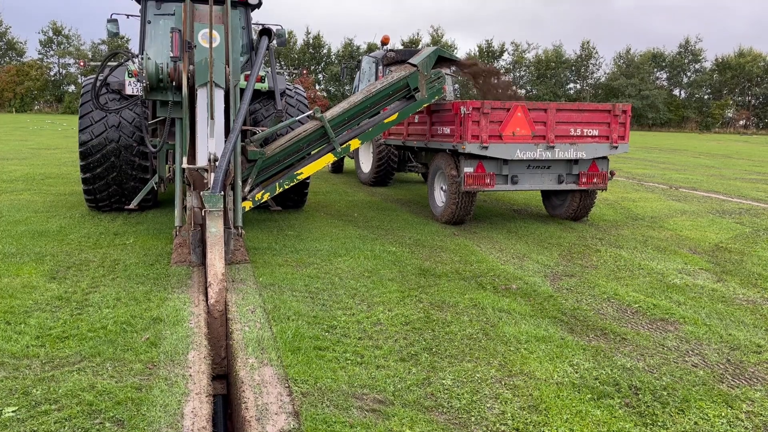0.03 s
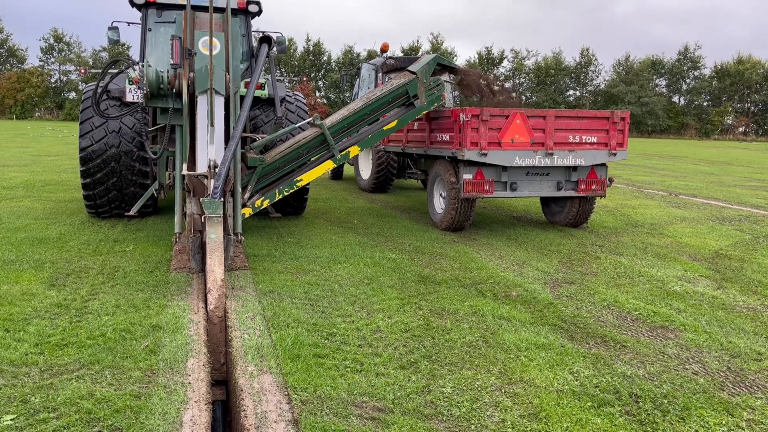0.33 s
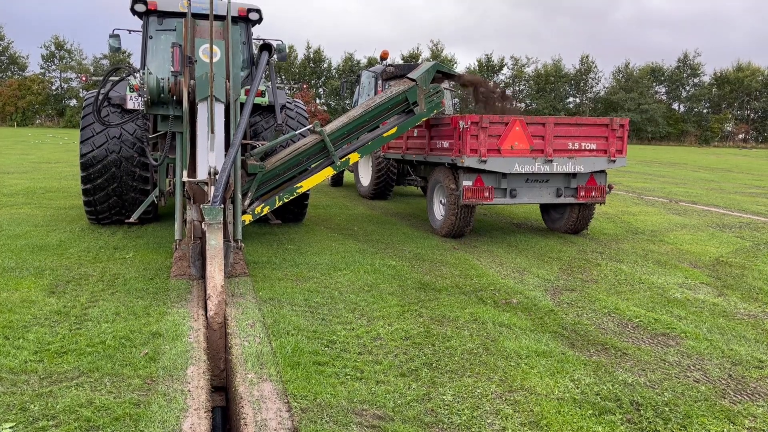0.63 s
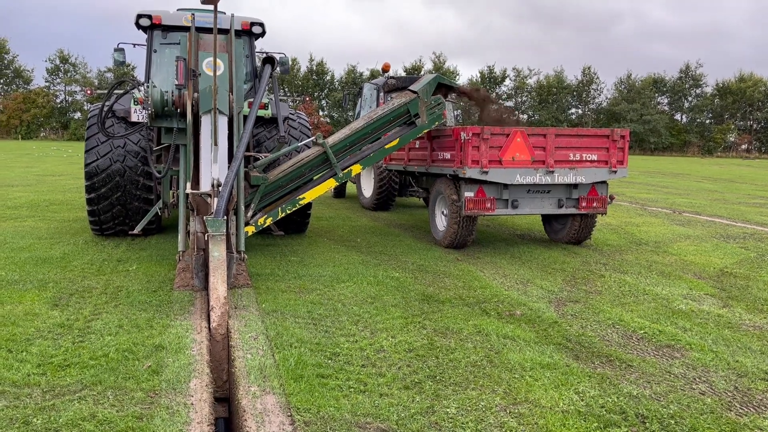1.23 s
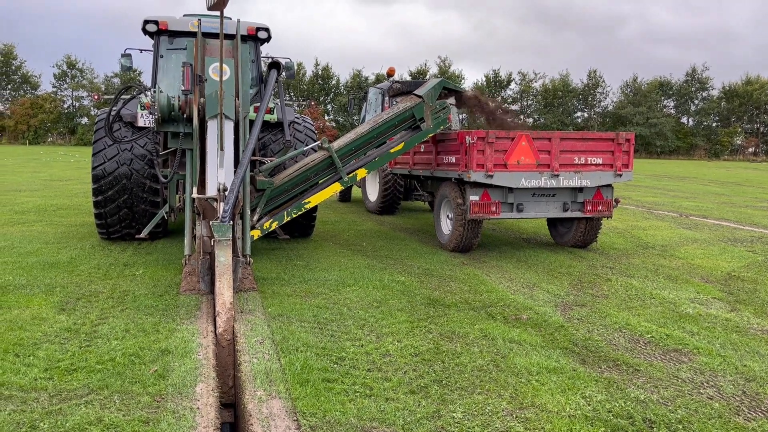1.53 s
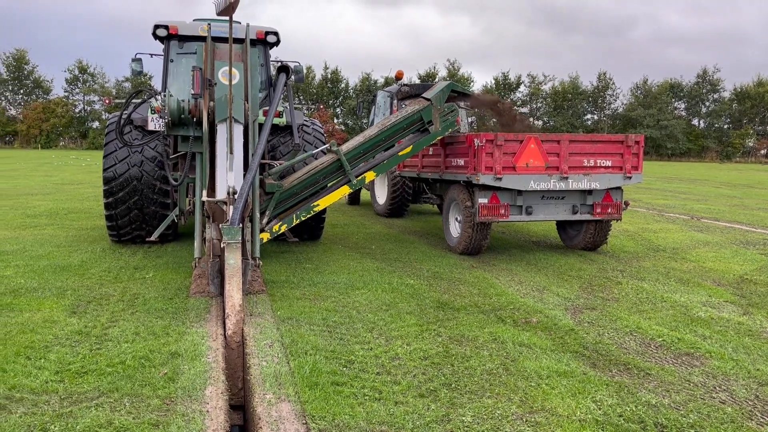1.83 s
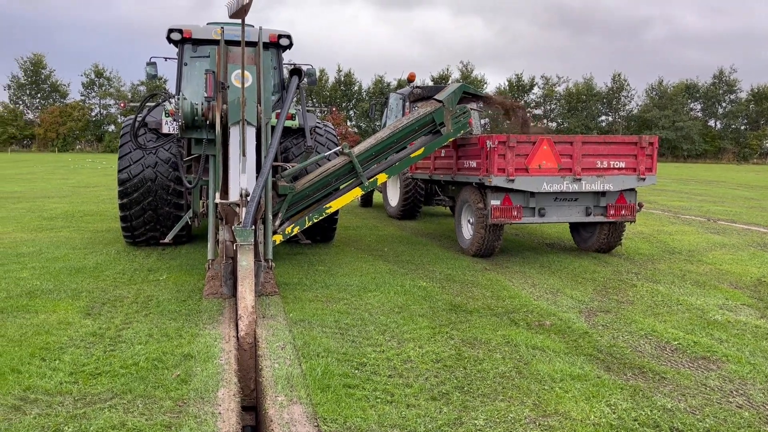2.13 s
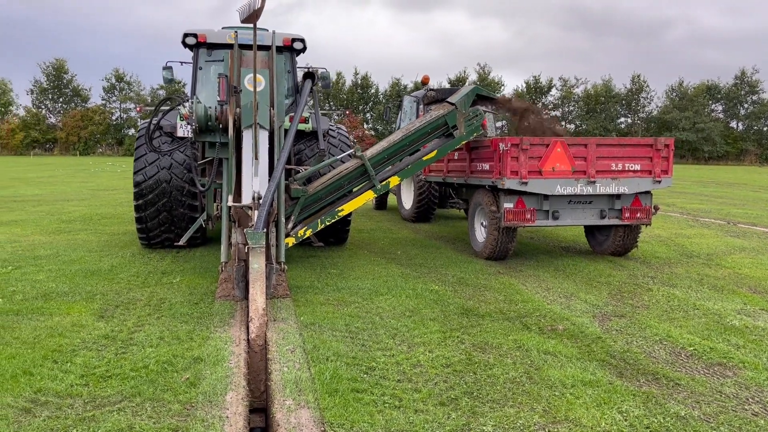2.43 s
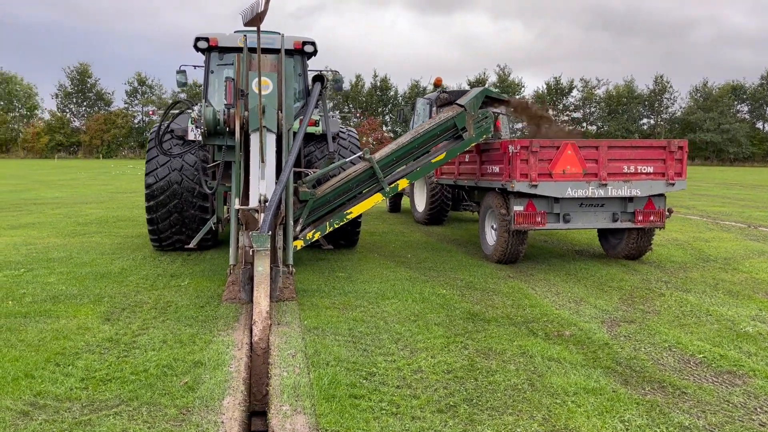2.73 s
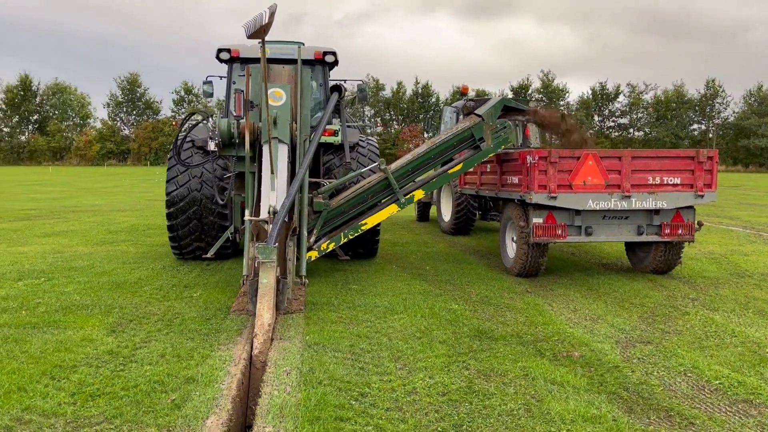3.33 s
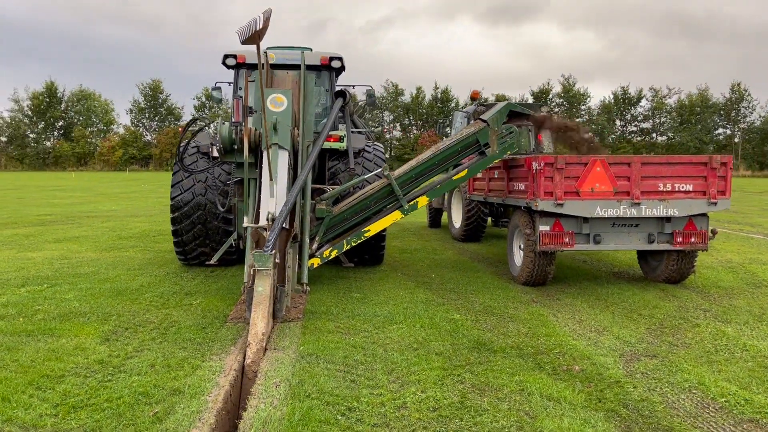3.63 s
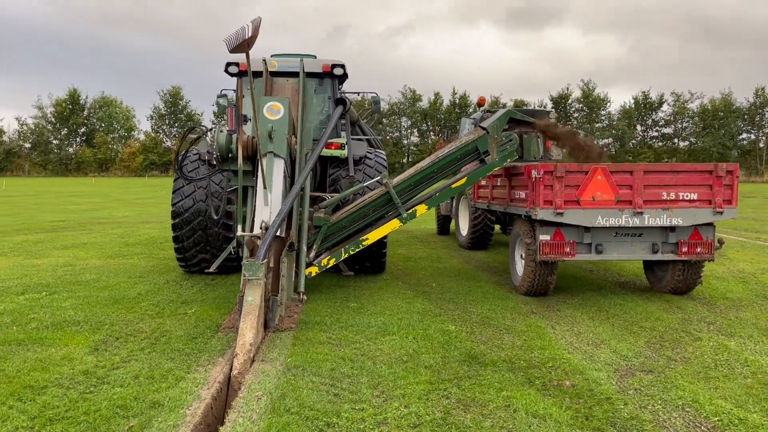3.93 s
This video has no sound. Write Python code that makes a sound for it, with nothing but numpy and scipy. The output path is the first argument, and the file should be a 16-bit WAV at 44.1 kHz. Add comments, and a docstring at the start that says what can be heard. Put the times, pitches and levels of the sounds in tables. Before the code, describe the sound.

A tractor-driven chain trencher digs a few metres away for the whole four seconds, a low, gritty roar pulsing with rapid tooth bites. Stones crunch and clank on steel and clods thud softly throughout, with tiny chain squeaks from about 1.3 seconds. A working tractor, an idling one and a faint gear whine drone underneath. Between about 2.5 and 3 seconds the sound shifts from left to centre.

```python
"""On open turf, a tractor-driven chain trencher cuts a few metres ahead; a second tractor idles beside it.
Teeth bite in a quick rhythm, driving soil and grit through ringing steel guards. Stones crunch, the chain
knocks on the guards, clods thud, the chain squeaks on stone. Exhaust tones and gear whines drone underneath.
Past halfway the listener shifts, and the machine moves from the left towards the centre."""
import sys
import numpy as np
from scipy import signal
from scipy.fft import rfft, irfft
from scipy.io import wavfile
from scipy.ndimage import uniform_filter1d

SR = 44100
rng = np.random.default_rng(int(sys.argv[2]) if len(sys.argv) > 2 else 0)


def persist_wave(psi):
    """Save psi, clipped to +-1, as 16-bit WAV."""
    counts = np.round(np.clip(psi, -1, 1) * 32767).astype(np.int16)
    wavfile.write(sys.argv[1], SR, np.atleast_2d(counts).T)


N = 176400

# chain speed: time_s, teeth_per_s
CHAIN_SPEED = [(0, 12.6), (0.5, 13.5), (0.9, 13.7), (1.3, 12.5), (2, 12.3), (2.35, 13.6), (2.8, 12.85),
               (3.6, 12.7), (4, 12.3)]
# digging load: time_s, gain_db
DIG_LOAD = [(0, 2), (.1, 1.3), (.2, -1.4), (.34, 0.25), (.87, 1.2), (.94, -2), (1.09, 2.8), (1.15, 4),
            (1.22, -0.5), (1.47, 1.3), (1.73, -1), (1.9, 1.9), (2.1, -1.1), (2.5, -.3), (2.63, -2.4),
            (2.69, 0), (2.9, 0), (2.98, -2.5), (3.19, 1.4), (3.31, -3.5), (3.42, -0.8), (3.68, -1.5),
            (3.75, 1.5), (3.81, -0.5), (3.88, 0.7), (4, 0.5)]
# stones crunching in the chain: centre_s, half_width_s, swell_db
STONE_CRUNCHES = [(.09, .005, 2.5), (0.257, 0.008, 4), (0.342, 0.012, 5), (.479, .005, 4),
                  (.813, 0.0046, 3), (1.076, 0.0064, 3.5), (1.163, 0.012, 3.5), (1.253, 0.0034, 7),
                  (1.398, 0.0051, 5), (1.493, 0.0046, 5.5), (1.561, 0.0054, 5), (1.856, 0.0073, 2.5),
                  (1.886, 0.014, 3.5), (2.051, 0.0089, 3.5), (2.204, .007, 5), (2.416, 0.0094, 7.5),
                  (2.492, .003, 5), (2.683, 0.011, 6), (2.725, .016, 3.5), (2.895, .008, 3),
                  (3.047, 0.0065, 8.5), (3.127, .005, 4), (3.18, .011, 5), (3.208, .008, 4.5),
                  (3.357, .004, 4.5), (3.44, .006, 5), (3.598, 0.011, 6)]
# roar of chain and soil, with microphone colour above 8 kHz: freq_hz, gain_db
ROAR_COLOUR = [(30, -28.5), (45, -18), (65, -9.5), (90, -2), (130, 0), (220, 1), (290, -4), (400, -6),
               (620, -7.8), (800, -9.2), (1150, -12.5), (1420, -26), (1570, -28.5), (1700, -21.5),
               (2200, -24), (2900, -26), (3600, -30), (5600, -30), (6200, -29.5), (7600, -31.5),
               (9200, -47), (10900, -33), (12100, -39), (12900, -57), (14000, -38.5), (15000, -34.5),
               (15500, -48)]
# steel guard resonances up to 5 kHz, plus a thin microphone ring at 11.6 kHz: freq_hz, width_hz, boost_db
RESONANCES = [(955, 100, 8), (1294, 123, 8.5), (1770, 350, 5.3), (3270, 280, 8), (3790, 200, 8),
              (4347, 280, 9.5), (4887, 400, 8.5), (11630, 590, 12)]
# low rumble of digging: time_s, gain_db
RUMBLE_GAIN = [(0, 0), (.93, 0), (1.15, 1), (1.22, -1), (1.7, -1), (2.05, .5), (2.12, -1), (2.19, 2.5),
               (2.35, -1), (2.47, 1.5), (2.8, -1.5), (2.88, -0.5), (2.97, -1.5), (3.2, -0.5), (3.3, -2),
               (3.6, -.5), (4, -1.5)]
# sizzle of fine soil: time_s, gain_db
SIZZLE_GAIN = [(0, -1.5), (.35, 0), (.7, 0.5), (.95, -0.5), (1.1, 4), (1.32, 2), (1.55, -1.5), (1.9, 2),
               (2.3, 3.5), (2.55, 1.5), (2.9, 0.5), (3.3, 0.5), (3.6, -1.5), (3.85, 1), (4, 4.5)]
# chain knocking on the guards: start_s, pitch_hz, relative_db
GUARD_KNOCKS = [(.086, 4350, -24), (.091, 960, -12), (.252, 925, -11.5), (.335, 893, -14),
                (.476, 4330, -24), (.572, 1711, -22.5), (.810, 3240, -23.5), (.850, 947, -14.5),
                (1.073, 11700, -25), (1.108, 1830, -24), (1.186, 1885, -24), (1.249, 1740, -22),
                (1.309, 11644, -23), (1.429, 1722, -23.5), (1.475, 972, -16), (1.485, 1754, -23),
                (1.568, 1710, -23), (1.649, 1733, -25), (1.848, 1819, -22), (1.877, 951, -18),
                (1.926, 954, -18), (1.969, 1701, -22.5), (2.201, 4320, -24), (2.413, 4374, -21.5),
                (2.680, 4340, -24), (3.042, 1765, -23), (3.120, 904, -19), (3.270, 990, -14.5),
                (3.353, 920, -15.5), (3.408, 1846, -23.5), (3.418, 952, -17), (3.589, 963, -18),
                (3.762, 889, -15), (3.828, 940, -12)]
# clods landing in the trench: start_s, pitch_hz, level_db
CLOD_THUDS = [(.068, 186, -17), (.151, 230, -16.5), (.345, 125, -13), (.62, 216, -12.5), (1.01, 216, -15),
              (1.14, 118, -18), (2.42, 160, -15), (2.512, 204, -13), (2.635, 231, -16), (2.73, 140, -17),
              (2.868, 200, -12.5), (3.043, 203.9, -17), (3.172, 200, -15), (3.196, 123, -10.5),
              (3.593, 167, -15.5)]
# chain slipping on stone, plus one stone clinking on steel at 1.312 s: start_s, final_pitch_hz, relative_db,
# decay_s, fall_hz
CHAIN_SQUEAKS = [(1.312, 4340, -26, 0.0064, 0), (1.555, 3420, -18, 0.0075, 0), (1.6, 3245, -24, 0.0065, 0),
                 (2.48, 5550, -21, 0.009, 1400), (2.91, 5820, -32, 0.011, 0),
                 (3.467, 5800, -28, 0.0051, 150), (3.621, 5794, -32, 0.01, 0), (3.901, 2834, -26, .011, 0)]
# working tractor's exhaust: cycle_harmonic, first_place_db, second_place_db
WORK_EXHAUST = [(2, -26, -26), (3, -2, -2), (6, -5, -7), (12, -12, -11.5), (13, -17, -17.5)]
# idling tractor's exhaust: firing_harmonic, first_place_db, second_place_db
IDLE_EXHAUST = [(1, -22, -22), (2, -1, -.5), (3, 3.5, 1), (5, -3, -3.5)]
# gears and conveyor: pitch_hz, level_db
DRIVE_WHINES = [(315, -35.5), (444, -43)]
# likeness of the roar at the two ears: freq_hz, coherence
EAR_COHERENCE = [(120, 1), (300, 0.99), (600, 0.92), (1400, 0.88), (3500, 0.7), (6000, 0.34), (8000, 1),
                 (12000, 1)]
# path to the first listening place: freq_hz, right_db, right_lag_rad
FIRST_PATH = [(128, -1, 0.5), (476, -4.5, 0.5), (675, -9.5, 0.74), (960, -14.5, 0.23), (1262, -10.5, -2.5),
              (1366, -7, 7.5), (1732, 0.5, 0.33), (2330, -4, 0.8), (2780, -4, 0.97), (3330, -13.5, 1),
              (3960, -6.5, 0), (5000, -10.5, 0.7), (5400, -5, 0.3), (8180, -0.5, -3), (10200, 4, -4.5),
              (11900, -1.5, -6.5), (13200, 0, -6.4), (15100, 0, -9.5)]
# path to the second listening place: freq_hz, left_db, right_db, right_lag_rad
SECOND_PATH = [(132, .5, 0, 0), (220, -.5, -1, .1), (300, 1.5, 1, .1), (440, -3, -3.3, 0.3),
               (620, .5, -1, -0.27), (970, -2.3, -4.6, 0.47), (1180, -0.5, -9, 1), (1380, 3.3, 6.7, 0.47),
               (1576, 7.5, 8, .6), (1735, -3, -4, 2), (1911.5, 1, 1, -0.5), (2300, 0, 0, -0.1),
               (2740, 1, 1, 1.3), (2870, 0, 7, 1.5), (3000, 0.5, 1, 2.2), (3400, -1, -7, 2),
               (4000, -2, -11, .5), (5000, -2.5, -11, .4), (5750, 1, -4, -0.1), (8400, -4.5, -3.5, -3.5),
               (9430, 4, 8.5, -3), (11040, -2.5, -3.5, -6), (13100, 2, 3, -7.5), (15000, -1, -1, -9)]

TIME_S = np.arange(N) / SR
FREQ_HZ = np.maximum(np.arange(N // 2 + 1) * SR / N, 1)
RING_AGE_S = np.arange(SR // 8) / SR


def trencher(roar_db=-18):
    """Soil rings the guards; the microphone colours the top. Returns partly alike left, right spectra."""
    force_db, pebbles = chain_force_db(), pebble_clinks()
    peaks_db = sum(db / (1 + (2 * (FREQ_HZ - hz) / width_hz) ** 2) for hz, width_hz, db in RESONANCES)
    response = minimum_phase(by_freq(ROAR_COLOUR) + peaks_db)
    roars = [irfft(soil(force_db, pebbles) * response, N) for _ in range(2)]
    near, other = (rfft(undb(roar_db) * unit(roar)) for roar in roars)
    coherence = by_freq(EAR_COHERENCE)
    impacts = rfft(chain_squeaks() + guard_knocks() + clod_thuds())
    return near + impacts, coherence * near + np.sqrt(1 - coherence ** 2) * other + impacts


def chain_force_db(bite_db=2.7, bite_width_teeth=.16, links_per_tooth=4, link_db=1.0, flutter_db=.55):
    """Soil load, links on the sprocket, and a tooth bite or a stone, whichever is harder."""
    teeth = cycles(curve(CHAIN_SPEED)) - .21
    from_bite = (teeth + .5) % 1 - .5
    bite = np.exp(-(from_bite / bite_width_teeth) ** 2) * (1 + .38 * wander(11))
    cut_db = np.maximum(bite_db * bite, crunch_db())
    links = np.cos(2 * np.pi * links_per_tooth * teeth)
    return curve(DIG_LOAD) + cut_db + link_db * links + flutter_db * wander(45)


def crunch_db():
    """Each stone in the chain adds a brief bell-shaped swell."""
    return sum(db * np.exp(-((TIME_S - centre_s) / half_width_s) ** 2)
               for centre_s, half_width_s, db in STONE_CRUNCHES)


def soil(force_db, pebbles, rumble_below_hz=573, sizzle_above_hz=8300, grit_db=-5.5, pebble_db=-19):
    """Digging spectrum: low rumble, scraping with grit and pebbles, fine sizzle on top."""
    grains = undb(grit_db) * grit()
    rush = unit((rng.standard_normal(N) + grains) * undb(force_db))
    scrape = unit(flicker_bands(rush)) + undb(pebble_db) * pebbles
    sizzle = unit(rush * undb(curve(SIZZLE_GAIN) + 2.5 * wander(18)))
    rumble_db = .18 * force_db + curve(RUMBLE_GAIN) + .35 * crunch_db()  # follows the chain only in part
    rumble = unit(rng.standard_normal(N) * undb(rumble_db + wander(21)))
    low = 1 / (1 + (FREQ_HZ / rumble_below_hz) ** 4)
    high = 1 / (1 + (sizzle_above_hz / FREQ_HZ) ** 8)
    return rfft(rumble) * np.sqrt(low) + rfft(scrape) * np.sqrt(1 - low) * (1 - high) + rfft(sizzle) * high


def grit(grains_per_s=1500, spread_db=2.5, decay_s=.0011):
    """Random grain impacts, each smeared into a tiny burst with a flat spectrum."""
    hits = (rng.random(N) < grains_per_s / SR) * rng.standard_normal(N)
    hits *= undb(spread_db * np.minimum(rng.exponential(size=N), 5))
    smear = rfft(rng.standard_normal(512) * np.exp(-TIME_S[:512] / decay_s), N)
    return unit(irfft(rfft(hits) * smear / np.abs(smear), N))


def flicker_bands(rush, depth_db=1.2, rate_hz=44.2):
    """Overlapping half-octave bands of the scraping flicker separately."""
    spectrum = rfft(rush)
    half_octaves = np.clip(2 * np.log2(FREQ_HZ / 500), 0, 9)
    bands = (irfft(spectrum * np.maximum(1 - np.abs(half_octaves - k), 0), N) for k in range(10))
    return sum(band * undb(depth_db * wander(rate_hz)) for band in bands)


def pebble_clinks(clinks_per_s=70, low_hz=2900, high_hz=7080, spread_db=2.6, decay_s=.0051):
    """Pebbles tick against steel, each with its own pitch and size."""
    age_s = TIME_S[:2048]
    out = np.zeros(N + len(age_s))
    for when, pitch, size in rng.random((int(clinks_per_s * N / SR), 3)):
        start = int(when * N)
        hz = low_hz * (high_hz / low_hz) ** pitch
        db = spread_db * min(-np.log(1 - size), 3)
        out[start:start + len(age_s)] += undb(db) * np.exp(-age_s / decay_s) * np.sin(2 * np.pi * hz * age_s)
    return unit(out[:N])


def guard_knocks(gain_db=-1.5, decay_at_1khz_s=.012):
    """Each knock of the chain on the guards excites one resonance; higher ones die sooner."""
    return sum(undb(db + gain_db) * ring(start_s, hz, decay_s=decay_at_1khz_s * (hz / 1000) ** -.4,
                                         rise_s=.0022, jitter_hz=80, overtone_ratio=1.37, overtone_db=-13)
               for start_s, hz, db in GUARD_KNOCKS)


def clod_thuds():
    """Clods land softly and boom for a few cycles."""
    return sum(undb(db) * ring(start_s, hz, decay_s=.013, rise_s=.0048,
                               jitter_hz=31, overtone_ratio=1.7, overtone_db=-9)
               for start_s, hz, db in CLOD_THUDS)


def chain_squeaks(gain_db=1.5, fall_s=.011):
    """Steel slips on stone and chirps, and one stone clinks on steel; some chirps fall in pitch as the slip
    slows."""
    slip = np.exp(-RING_AGE_S / fall_s)
    return sum(undb(db + gain_db) * ring(start_s, hz + fall_hz * slip, decay_s, rise_s=.0037,
                                         jitter_hz=110, overtone_ratio=2, overtone_db=-17)
               for start_s, hz, db, decay_s, fall_hz in CHAIN_SQUEAKS)


def ring(start_s, pitch_hz, decay_s, rise_s, jitter_hz, overtone_ratio, overtone_db):
    """A slightly rough tone and one overtone: quick rise, exponential decay."""
    envelope = (1 - np.exp(-RING_AGE_S / rise_s)) ** 2 * np.exp(-RING_AGE_S / decay_s)
    jitter = unit(uniform_filter1d(rng.standard_normal(len(RING_AGE_S)), size=36))
    phase = 2 * np.pi * cycles(pitch_hz + jitter_hz * jitter)
    tone = np.sin(phase) + undb(overtone_db) * np.sin(overtone_ratio * phase)
    return np.pad(envelope / envelope.max() * tone, (int(start_s * SR), N))[:N]


def engine(tones, moved, rate_hz, speed_spread=.00441, waver_db=1.0):
    """Exhaust tones locked to one unsteady crankshaft; their balance depends on the listening place."""
    base_cycles = cycles(rate_hz * (1 + speed_spread * wander(1.7)))
    exhaust = 0
    for harmonic, first_db, second_db in tones:
        level_db = first_db * (1 - moved) + second_db * moved + waver_db * wander(6.4)
        exhaust += undb(level_db) * np.sin(2 * np.pi * (harmonic * base_cycles + rng.random()))
    return unit(exhaust)


def drive_whine(waver_db=2.15, pitch_spread=.00724):
    """Gears and conveyor whine, wavering in level and pitch."""
    out = 0
    for hz, db in DRIVE_WHINES:
        amplitude = np.sqrt(2) * undb(db + waver_db * wander(5.1))
        pitch_hz = hz * (1 + pitch_spread * wander(10.6))
        out += amplitude * np.sin(2 * np.pi * cycles(pitch_hz))
    return out


def undb(db):
    """Decibels to amplitude."""
    return 10 ** (db / 20)


def unit(x):
    """Scale to rms 1."""
    return x / np.sqrt(np.mean(x ** 2))


def curve(table):
    """Join (time_s, value) rows by straight lines."""
    return np.interp(TIME_S, *np.array(table).T)


def by_freq(table, column=1):
    """Interpolate one column over log frequency."""
    rows = np.array(table)
    return np.interp(np.log(FREQ_HZ), np.log(rows[:, 0]), rows[:, column])


def minimum_phase(gain_db):
    """Causal response for a gain curve, so rings follow their hits."""
    cepstrum = irfft(gain_db * np.log(10) / 20, N)
    cepstrum[1:N // 2] *= 2
    cepstrum[N // 2 + 1:] = 0
    return np.exp(rfft(cepstrum))


def wander(rate_hz):
    """Smooth random drift, rms 1."""
    return unit(irfft(rfft(rng.standard_normal(N)) * np.exp(-(FREQ_HZ / rate_hz) ** 2), N))


def cycles(rate_hz):
    """Cycles completed at a changing rate."""
    return np.cumsum(rate_hz) / SR


def scene(move_start_s=2.45, move_end_s=3.02, work_db=-23, idle_db=-32):
    """The trencher crossfades from one listening place to the next, over both engines and the whine."""
    left, right = trencher()
    first_right = right * undb(by_freq(FIRST_PATH)) * np.exp(-1j * by_freq(FIRST_PATH, 2))
    second_left = left * undb(by_freq(SECOND_PATH))
    second_right = right * undb(by_freq(SECOND_PATH, 2)) * np.exp(-1j * by_freq(SECOND_PATH, 3))
    first = irfft(np.array([left, first_right]), N)
    second = irfft(np.array([second_left, second_right]), N)
    moved = curve([(move_start_s, 0), (move_end_s, 1)])
    working = undb(work_db) * engine(WORK_EXHAUST, moved, rate_hz=16.86)  # four-stroke cycle rate
    idling = undb(idle_db) * engine(IDLE_EXHAUST, moved, rate_hz=30.02)  # firing rate
    return first * (1 - moved) + second * moved + working + idling + drive_whine()


def record(dry):
    """Steep low-pass at 15.4 kHz."""
    return signal.sosfilt(signal.ellip(8, .2, 80, 15400, fs=SR, output="sos"), dry)


dry = scene()
out = record(dry)
persist_wave(out)
```